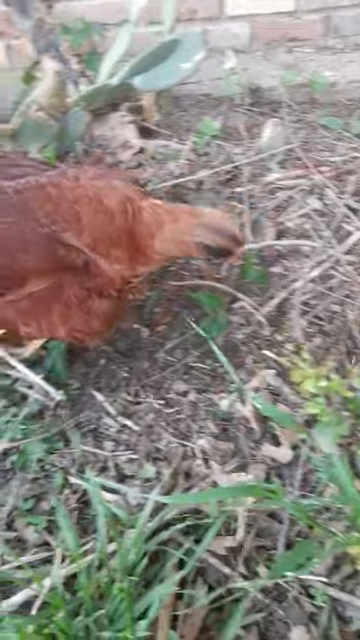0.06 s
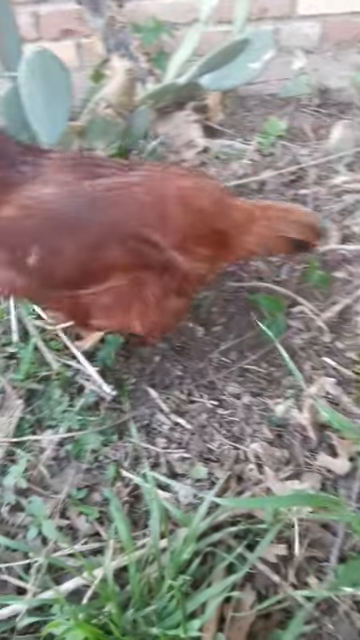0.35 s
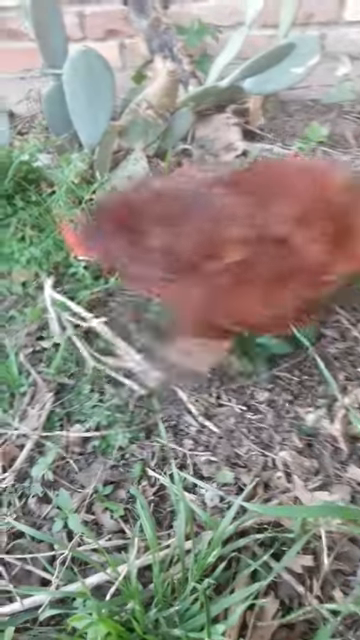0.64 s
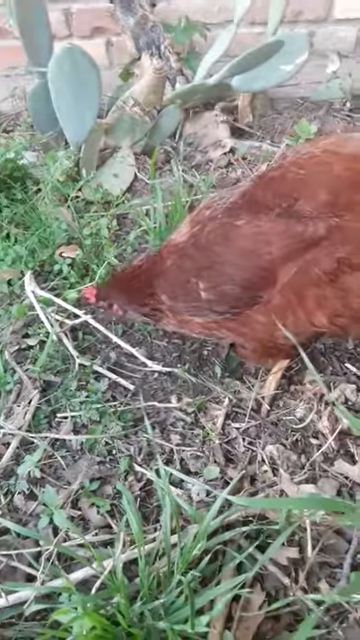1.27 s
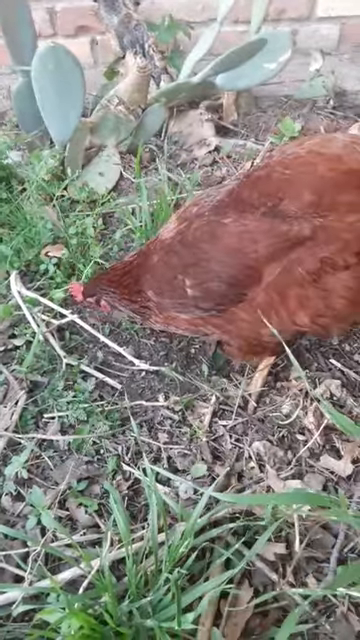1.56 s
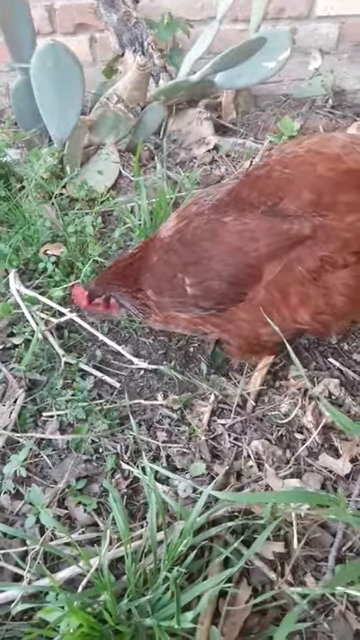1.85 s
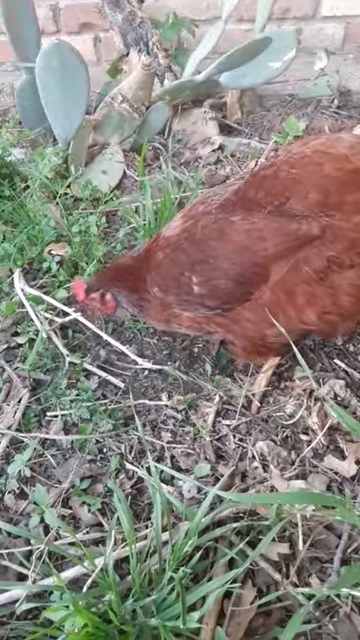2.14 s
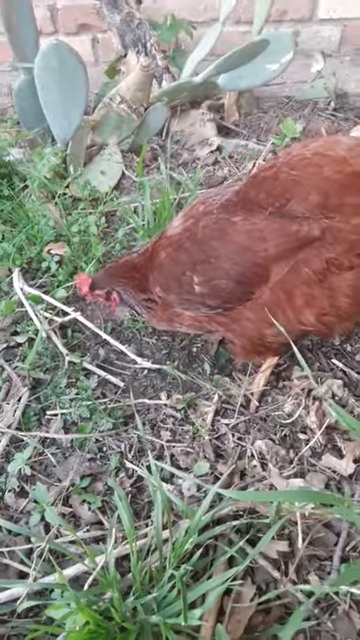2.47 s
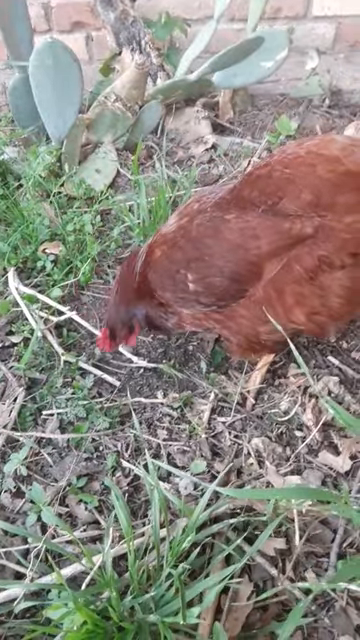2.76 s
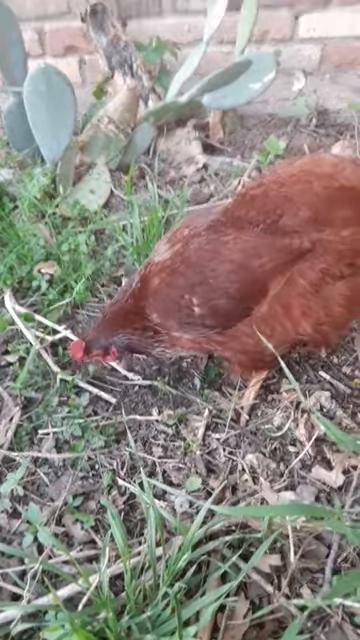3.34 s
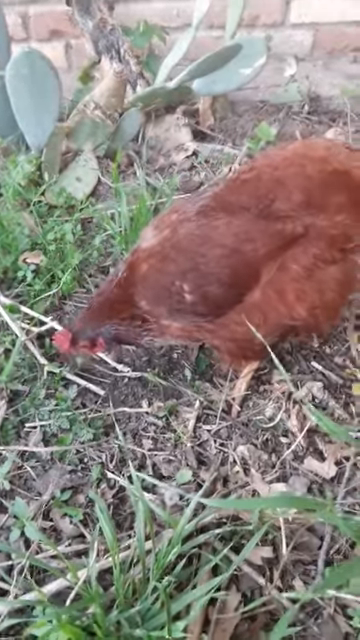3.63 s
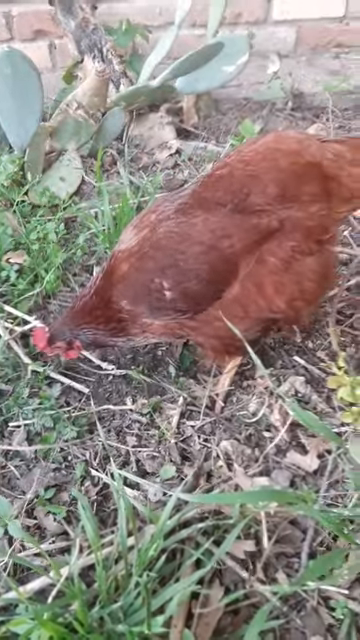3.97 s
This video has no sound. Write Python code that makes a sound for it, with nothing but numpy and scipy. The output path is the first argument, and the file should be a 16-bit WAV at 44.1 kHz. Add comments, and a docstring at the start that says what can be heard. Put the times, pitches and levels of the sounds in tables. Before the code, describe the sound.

A hen scratches and pecks through crackling dry leaves and twigs outdoors.

```python
"""From the start, a low rumble, a machine hum and a thin hiss lie behind a hen near a brick wall.
She steps through dry leaves and rakes them back with a foot: each stroke is a shower of tiny
leaf cracks, and single twigs snap. Then she pecks and tosses bits of litter, and now and then
her beak or foot knocks on the soil. After about two seconds, two faint, distant birds join in."""
import sys
import numpy as np
from scipy import signal
from scipy.fft import rfft, irfft
from scipy.io import wavfile
from scipy.ndimage import uniform_filter1d

SR = 44100
rng = np.random.default_rng(int(sys.argv[2]) if len(sys.argv) > 2 else 0)


def log_audio(samples):
    """Write samples as a 16-bit WAV file to the path given in sys.argv[1]."""
    # one column per channel
    frames = np.atleast_2d(samples).T
    # limit to full scale, then quantise
    limited = np.clip(frames, -1, 1)
    pcm = np.round(limited * 32767).astype(np.int16)
    wavfile.write(sys.argv[1], SR, pcm)


N = 176400
TIME, FREQS = np.arange(N) / SR, np.fft.rfftfreq(N, 1 / SR)
RING_DECAY_S = 0.00049


def amp(db):
    """Turns decibels into a number to multiply a sound by."""
    return 10 ** (np.asarray(db) / 20)


def unit(x):
    """Scales a signal to an average size (rms) of 1."""
    return x / np.sqrt(np.mean(x ** 2) + 1e-20)


def curve_at(points, hz):
    """Reads between the rows of a table, giving each octave equal room."""
    row_hz, value = np.transpose(points)
    return np.interp(np.log(hz + 1), np.log(row_hz + 1), value)


def pan(left_db):
    """Two channel gains that make the left louder than the right by left_db."""
    return amp(np.array([[.5], [-.5]]) * left_db)


def add(mix, start_s, sound):
    """Mixes a sound in at its start time."""
    part = mix[:, max(round(start_s * SR), 0):][:, :sound.shape[-1]]
    part += sound[..., :part.shape[-1]]


def colour(x, tone):
    """Gives a sound a tone curve, using a filter that never rings ahead of a crack."""
    log_gain = np.log(amp(curve_at(tone, abs(np.fft.fftfreq(4096, 1 / SR)))))
    response = np.exp(np.conj(signal.hilbert(log_gain)))
    taps = np.fft.ifft(response).real[:2048]
    return signal.oaconvolve(x, taps[None] / np.linalg.norm(taps), axes=1)[:, :N]


def partly_alike(a, b, likeness):
    """Blends two noises into left and right: likeness 0 is unrelated, 1 is the same."""
    return np.array([a, likeness * a + np.sqrt(1 - likeness ** 2) * b])


def outdoor_air():
    """Outdoor noise whose low rumble slowly swells and sinks."""
    # Tone of the noise: pitch_hz, level_db
    tone = [(15, -37), (26, -19), (37, -5.5), (60, 0), (95, -2), (118, 3), (138, 3.5), (162, -7), (215, -9),
            (275, -14.5), (335, -13), (480, -21.5), (720, -16), (1100, -17.5), (1600, -24), (2300, -33),
            (3600, -37.5), (5500, -42), (9000, -47), (12500, -36.5), (16000, -40.5)]
    # How alike left and right are: pitch_hz, likeness (0 to 1)
    likeness = [(30, 1), (150, 1), (300, 0.87), (550, 0.77), (1000, 0.22), (2000, 0.1), (5000, 0.042),
                (15000, 0.038)]
    # Lean to the left: pitch_hz, left_db
    balance = [(30, 8), (200, 5.5), (600, 6.5), (1100, 4), (2200, 0), (4400, 7), (8000, 5), (15000, -3.5)]
    # Swell of the rumble: time_s, gain_db
    swell = [(0, 2), (.2, 4.5), (.5, 1), (1.2, 0), (2.2, -.5), (3.0, -1.5), (3.5, 1.8), (4, -3)]
    spectrum = partly_alike(*rfft(rng.standard_normal((2, N))), curve_at(likeness, FREQS))
    spectrum = spectrum * amp(curve_at(tone, FREQS)) * pan(curve_at(balance, FREQS))
    whole = irfft(spectrum, N)
    rumble = irfft(spectrum / (1 + (FREQS / 450) ** 4), N)  # the part below 450 Hz
    rumble_gain = amp(np.interp(TIME, *np.transpose(swell)))
    return amp(-45) * (whole + rumble * (rumble_gain - 1)) / whole.std()


def machine_hum(wander_hz=1.575, swell_db=4.1):
    """A distant machine hums a few tones that waver in pitch and loudness."""
    # Tones of the hum: pitch_hz, level_db
    tones = [(113.5, -54.5), (136, -57.5), (210, -63), (333, -66.5), (587.5, -73.5)]
    keep_slow = np.exp(-(FREQS / 4) ** 2)
    out = np.zeros(N)
    for pitch_hz, level_db in tones:
        drift, swell = map(unit, irfft(rfft(rng.standard_normal((2, N))) * keep_slow, N))
        phase = 2 * np.pi * np.cumsum(pitch_hz + wander_hz * drift) / SR
        out += amp(level_db) * unit(amp(swell_db * swell) * np.sin(phase))
    return out * pan(left_db=4)


def thin_hiss(pitch_hz=4345, width_hz=340):
    """A narrow band of noise makes a steady, distant hiss."""
    band = np.exp(-((FREQS - pitch_hz) / width_hz) ** 2)
    hiss = irfft(rfft(rng.standard_normal((2, N))) * band, N)
    return amp(-74.5) * unit(hiss) * pan(left_db=6.5)


def crack(decay_s, size=512):
    """One crack: a burst of noise that dies fast and differs between left and right."""
    noise = partly_alike(*rng.standard_normal((2, size)), likeness=0.097)
    burst = noise * np.exp(-np.arange(size) / SR / decay_s)
    return burst / np.linalg.norm(burst, axis=1, keepdims=True)


def ring(pitch_hz, decay_s, size=512):
    """A broken piece vibrates at one pitch and quickly fades."""
    t = np.arange(size) / SR
    ping = np.sin(2 * np.pi * (pitch_hz * t + rng.random((2, 1)))) * np.exp(-t / decay_s)
    return ping / np.linalg.norm(ping, axis=1, keepdims=True)


def crackle(cracks_per_s, spread_db, pitches=32):
    """Leaf flakes of many pitches crack at random moments with random force."""
    count = int(cracks_per_s * N / SR / pitches)
    out = np.zeros((2, N))
    for pitch_hz in np.geomspace(2500, 15000, pitches):
        grain = crack(decay_s=0.00032, size=256) + .5 * ring(pitch_hz, RING_DECAY_S / 2, size=256)
        moment, chance = rng.random((2, 4000))[:, :count]
        force = amp(-spread_db * np.log(np.maximum(chance, .025)))  # many weak, few strong
        hits = np.bincount((moment * N).astype(int), force, N)
        out += signal.oaconvolve(hits[None], grain, axes=1)[:, :N]
    return unit(out)


def shifting_leaves(crunch, depth_db=2, width_hz=219, span_s=0.011):
    """Leaves of different sizes pass under the foot, so the tone keeps changing at random."""
    hz, t, spectra = signal.stft(crunch, SR, nperseg=512, noverlap=384)
    across = np.fft.fftfreq(len(hz), hz[1])[:, None]
    along = np.fft.fftfreq(len(t), t[1])
    blur = np.exp(-(np.pi * across * width_hz) ** 2 - (np.pi * along * span_s) ** 2)
    noise = rng.standard_normal(spectra.shape[1:])
    patches = unit(np.fft.ifft2(np.fft.fft2(noise) * blur).real)  # loud and soft spots in pitch and time
    return signal.istft(spectra * amp(depth_db * patches), SR, nperseg=512, noverlap=384)[1][:, :N]


def leaf_rustle(big_leaves_db=-11):
    """Each stroke of foot or beak swells, holds and fades, cracking small flakes and big leaves."""
    # Strokes; the last two columns set the share of big leaves and of loose crackle:
    # start_s, rise_s, hold_s, fall_db_per_s, level_db, leaves_db, loose_db
    strokes = [(0.0, 0.001, 0.0097, 108, -36.5, 2.5, -10.5), (0.18, 0.018, .03, 100, -41, -1, -18),
               (0.221, 0.011, 0.031, 104, -34.5, -1, -13), (0.302, 0.022, 0.033, 271, -37.5, 0, -23),
               (0.435, .01, .02, 100, -45.5, -5, -12), (0.457, 0.029, .15, 221, -35, 0.5, -11),
               (0.561, .04, .015, 300, -39.5, 1, -1.5), (0.655, 0.029, 0.061, 82, -30, 3, -14.5),
               (0.831, 0.026, 0.033, 148, -36.5, 2, -4), (1.067, 0.0082, 0.022, 134, -54, -9, 4.5),
               (1.206, 0.032, 0.048, 200, -64.5, -7, 3), (1.314, 0.0046, 0.0087, 298, -48, 2.5, -6),
               (1.412, 0.012, .005, 125, -64, -7, 2.5), (1.777, 0.018, .015, 200, -53.5, 6, -3),
               (1.807, 0.011, 0.024, 330, -37.5, 2.5, -5), (1.886, 0.0092, .012, 127, -50, 0.5, -6.5),
               (2.146, .002, 0.0091, 450, -47, -2, -13), (2.18, .005, 0.055, 74, -62, 0, -6),
               (2.34, 0.033, 0.083, 98, -58.5, 5, -4), (2.52, .005, 0.008, 300, -67, 8, -3),
               (2.657, .004, 0.018, 79, -62, -6, -4), (2.792, .01, .14, 78, -66, 3, -3),
               (3.004, 0.035, 0.23, 60, -60, 0.5, -1.5), (3.292, 0.0045, .02, 172, -48, 0, -12),
               (3.358, .01, 0.024, 220, -43, 3.5, -7.5), (3.437, .04, .05, 220, -52.5, 4, -1.5),
               (3.55, .02, 0.091, 53, -63, 1, -8), (3.807, 0.019, .006, 300, -49, 0.5, -9),
               (3.85, .01, 0.029, 97, -54, -3, -1)]
    # Tone of small dry flakes: pitch_hz, level_db
    flake_tone = [(100, -21), (600, -14), (2000, -6.5), (3200, -12.5), (5000, -8), (6800, -5), (8300, -3.5),
                  (11500, -0.5), (14000, 1), (16000, 1)]
    # Tone of big leaves: pitch_hz, level_db
    leaf_tone = [(100, -21), (500, -8), (1200, -8), (2000, -7.5), (2900, 2.5), (4300, 2), (6000, -2.5),
                 (9000, -5), (16000, -12)]
    power = np.zeros((2, 2, N))  # fine or loose, flakes or leaves, time
    for start_s, rise_s, hold_s, fall_db_per_s, level_db, leaves_db, loose_db in strokes:
        t = TIME - start_s
        fallen_db = abs(fall_db_per_s) * np.maximum(t - rise_s - hold_s, 0)
        level = np.clip(t / rise_s, 0, 1) * amp(level_db - fallen_db)
        shares = np.outer(amp([0, loose_db]), amp([0, big_leaves_db + leaves_db]))
        power += (shares[..., None] * level) ** 2
    (fine_flakes, fine_leaves), (loose_flakes, loose_leaves) = np.sqrt(power)
    # Many tiny cracks make a crunch; fewer, more uneven ones make a loose crackle.
    flake_crunch = crackle(cracks_per_s=9000, spread_db=1)
    loose = crackle(cracks_per_s=330, spread_db=4.5)
    leaf_crunch = crackle(cracks_per_s=4500, spread_db=1)
    flakes = colour(flake_crunch * fine_flakes + loose * loose_flakes, flake_tone)
    leaves = colour(leaf_crunch * fine_leaves + loose * loose_leaves, leaf_tone)
    return shifting_leaves(flakes + leaves) * pan(left_db=3)


def echoes(sound, decay_s, size=12000):
    """Scattered reflections arrive after 3 ms and die away."""
    t = np.arange(size) / SR
    tail = rng.standard_normal((2, size)) * np.exp(-t / decay_s) * (t > .003)
    return signal.oaconvolve(sound, tail / np.linalg.norm(tail[0]), axes=1)[:, :N]


def twig_snaps(rise_s=0.00036):
    """Fibres give way in a quick crack, and the piece that broke rings briefly."""
    # Twigs and leaf ribs snapping:
    # start_s, strength_db, ring_hz, ring_db (compared with the crack), crack_decay_s, left_db
    snaps = [(0.0357, -38, 4850, 2.5, 0.00037, 7), (0.064, -32.5, 3300, -5, 0.0026, 4),
             (.108, -43, 12000, -5, .0008, -1), (.4915, -40, 8200, 3, .0005, 2),
             (0.5844, -29, 5740, -4, 0.00023, -1), (.62, -35, 5070, -5, 0.0006, 7),
             (0.629, -29, 4000, -12, 0.00066, 1), (0.726, -20.5, 11500, -1, .0013, 4),
             (0.7284, -21, 11200, -3, 0.0016, 0), (0.737, -31, 13000, -3, 0.00056, 2),
             (0.7507, -38.5, 4100, 2.5, .0004, 9), (0.843, -32, 7000, -6, 0.00054, 6),
             (0.876, -33, 12000, 6, 0.0012, 0), (.8845, -32, 11900, 1, .0005, 0),
             (0.92, -40, 7700, -4, .0006, 1), (0.931, -32.5, 4950, -11, .0008, 5),
             (0.9651, -33.5, 4760, -11, 0.00047, 3), (1.031, -49, 8000, -8, .0008, 1),
             (1.053, -60, 9000, -7, .0004, 1), (1.083, -35.5, 4840, -13, 0.00048, 2),
             (1.132, -45.5, 7100, -9, 0.00094, 11), (1.139, -45.5, 8000, -2, 0.00086, -2),
             (1.3208, -35.5, 12300, -2, 0.0023, 4), (1.371, -54, 7940, -7, 0.0011, 12),
             (1.9015, -41, 8900, -16, 0.00055, 1), (1.9812, -50, 12240, 6.5, .0004, -4),
             (2.1492, -44.5, 3430, -9.5, 0.00092, 6), (2.161, -48, 10000, -11, .0008, 8),
             (2.187, -47.5, 7600, -1.5, 0.00079, 7), (2.2415, -45, 3720, -4.5, 0.0027, 3),
             (2.2838, -46.5, 13000, -9, 0.00097, 4), (2.322, -44, 3540, -5, 0.0043, 2),
             (2.3975, -51, 9000, -10, .001, 2), (2.4187, -41.5, 2820, -8, 0.0027, -1),
             (2.5065, -43, 13200, -10, .0005, -10), (2.526, -48.5, 3000, 0.5, .0007, 4),
             (2.529, -50, 8000, -13, .0006, -2), (3.0636, -45.5, 3900, -5, 0.0012, 6),
             (3.0658, -41.5, 12100, -3, 0.00044, 2), (3.188, -55, 11900, 3, .0005, -13),
             (3.2288, -46.5, 12600, -9, 0.00037, -11), (3.301, -43, 3080, 3, .001, 2),
             (3.3707, -38.5, 12100, 2, 0.00053, -1), (3.375, -49, 10000, -9, .0008, -2),
             (3.3945, -34.5, 3900, -2.5, 0.0008, 1), (3.485, -38, 11100, -6, 0.0011, 0),
             (3.49, -45, 5000, -4, .0015, -2), (3.513, -41, 10100, -17, 0.0013, 1),
             (3.55, -43, 9900, -17, 0.00035, 3), (3.827, -51, 11200, 4, .001, 7),
             (3.904, -57, 11000, -1, .0008, 0), (3.92, -44, 10100, -13, .0006, 0)]
    # Tone of the cracks: pitch_hz, level_db
    tone = [(100, -6), (1200, -18.5), (3000, -3.5), (7000, -2), (12000, 2), (16000, -1)]
    cracks, rings = np.zeros((2, 2, N))
    for start_s, strength_db, ring_hz, ring_db, crack_decay_s, left_db in snaps:
        force = 10 * amp(strength_db) * pan(left_db)
        burst = crack(crack_decay_s)
        burst *= 1 - np.exp(-TIME[:burst.shape[1]] / rise_s)
        add(cracks, start_s, force * burst / np.linalg.norm(burst, axis=1, keepdims=True))
        add(rings, start_s, force * amp(ring_db) * ring(ring_hz, RING_DECAY_S))
    return colour(cracks, tone) + rings


def soil_knocks(grit_db=-7):
    """Beak or foot gives the ground one dull push, with a little grit."""
    # Knocks on the soil: start_s, strength_db
    knocks = [(0.832, -43.5), (1.3353, -45), (3.37, -53), (3.4852, -35)]
    # Tone of a knock: pitch_hz, level_db
    tone = [(100, -30), (400, 13), (1000, 1.5), (2000, 1), (3300, 1.5), (5000, -25), (16000, -27)]
    out = np.zeros((2, N))
    for start_s, strength_db in knocks:
        push = signal.unit_impulse(512) + amp(grit_db) * crack(decay_s=.001)
        add(out, start_s, 10 * amp(strength_db) * push)
    return colour(out, tone) * pan(left_db=4.7)


def bird_note(pitch_hz, waver_share=0.0287):
    """A note that fades in and out while wavering around a pitch curve."""
    waver = unit(uniform_filter1d(rng.standard_normal(N), size=300))[:len(pitch_hz)]
    phase = 2 * np.pi * np.cumsum(pitch_hz * (1 + waver_share * waver)) / SR
    return unit(np.sin(phase) * signal.windows.tukey(len(pitch_hz), .5))


def far_birds(whistle_s=.105, whistle_from_hz=1750, call_s=0.111, call_hz=1608):
    """Two birds blurred by echoes: one whistles upward, the other's calls rise and fall a little."""
    # Rising whistles: start_s, level_db, top_hz
    whistles = [(2.15, -68, 3100), (2.5, -70, 2870), (2.85, -69.5, 2770), (3.2, -66, 3100),
                (3.555, -67, 3360)]
    # The second bird's calls: start_s, level_db
    calls = [(2.17, -70), (2.6, -67), (3.036, -65), (3.48, -65)]
    out = np.zeros((2, N))
    for start_s, level_db, top_hz in whistles:
        sweep_hz = np.geomspace(whistle_from_hz, top_hz, int(whistle_s * SR))
        add(out, start_s, amp(level_db) * bird_note(sweep_hz))
    arch_hz = call_hz * (1 + 0.0697 * np.sin(np.linspace(0, np.pi, int(call_s * SR))))
    for start_s, level_db in calls:
        add(out, start_s, amp(level_db) * bird_note(arch_hz))
    return .5 * out + echoes(out, decay_s=0.051)


def scene():
    """The hen, with echoes from wall and ground, over the background."""
    # How the hen's sound leans between the two microphones: pitch_hz, left_db
    balance = [(300, 0), (1200, -1), (2300, -1.5), (3200, -4), (4500, 0.5), (6000, 3.5), (8000, 1.5),
               (15000, -4)]
    hen = leaf_rustle() + twig_snaps() + soil_knocks()
    hen = hen + amp(-12) * echoes(hen, decay_s=0.006)
    hen = irfft(rfft(hen) * pan(curve_at(balance, FREQS)), N)
    return hen + outdoor_air() + machine_hum() + thin_hiss() + far_birds()


def record(dry):
    """Cuts the highest treble, above 15580 Hz."""
    low_pass = signal.firwin(401, 15580, window=("kaiser", 8), fs=SR)
    return signal.oaconvolve(dry, low_pass[None], "same")


dry = scene()
out = record(dry)
log_audio(out)
```